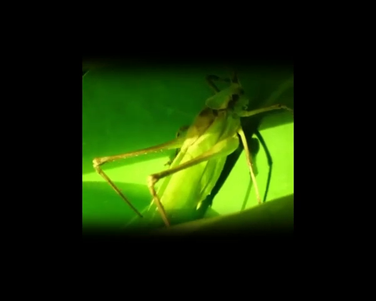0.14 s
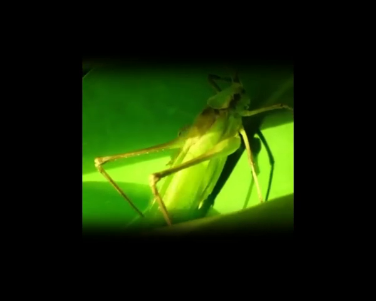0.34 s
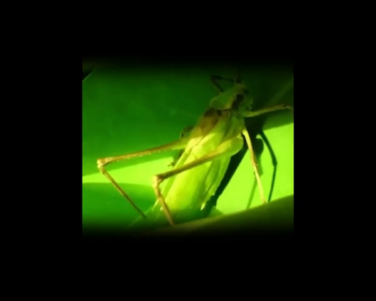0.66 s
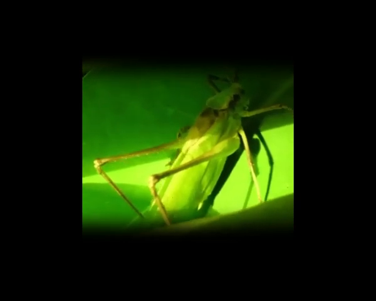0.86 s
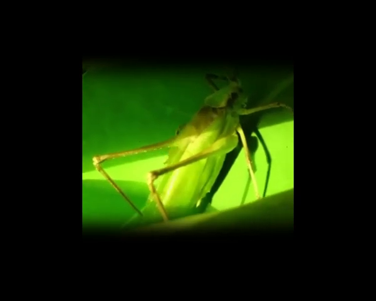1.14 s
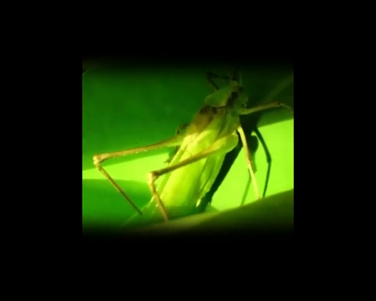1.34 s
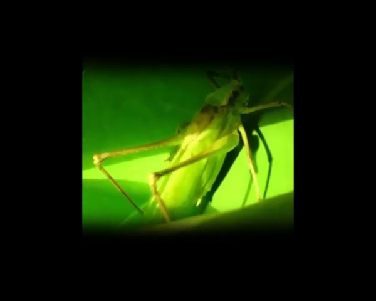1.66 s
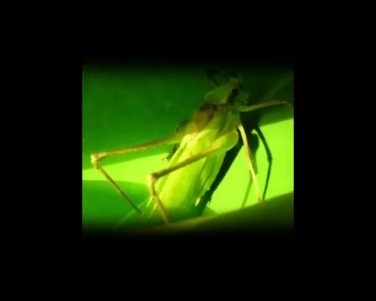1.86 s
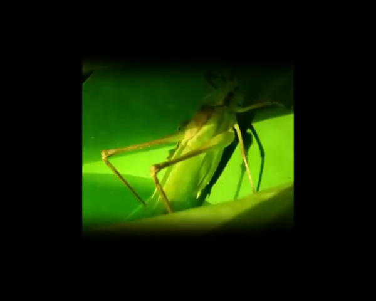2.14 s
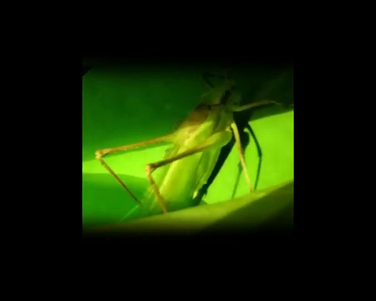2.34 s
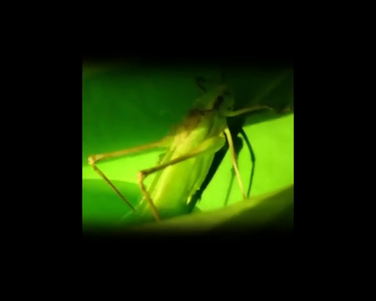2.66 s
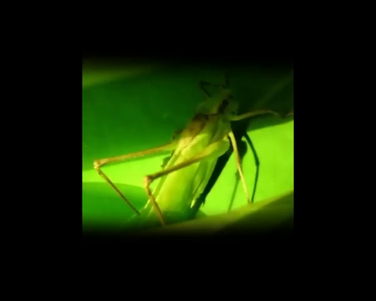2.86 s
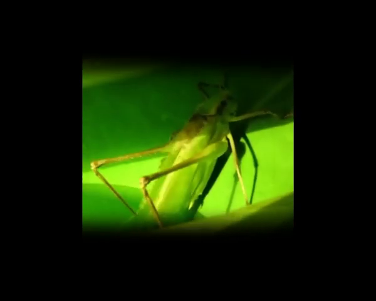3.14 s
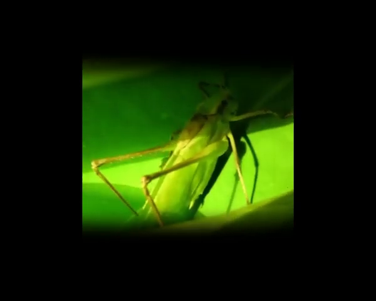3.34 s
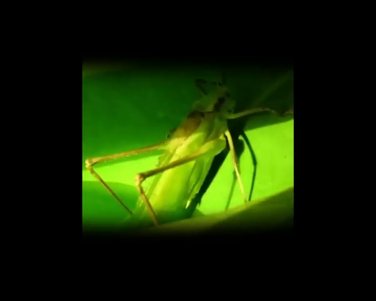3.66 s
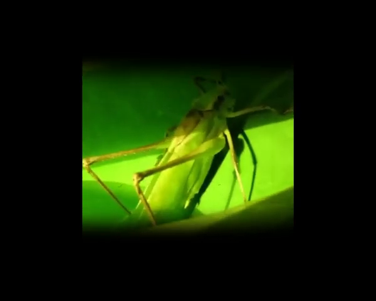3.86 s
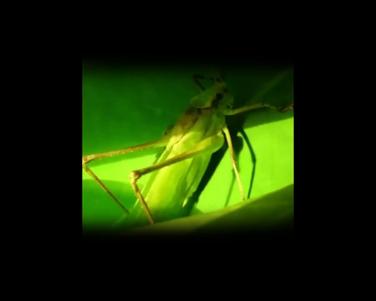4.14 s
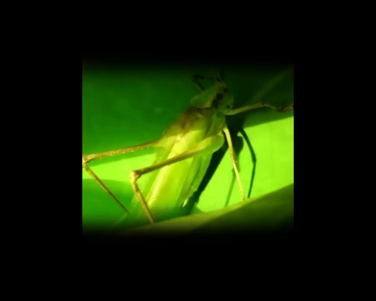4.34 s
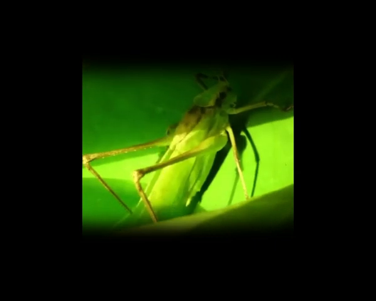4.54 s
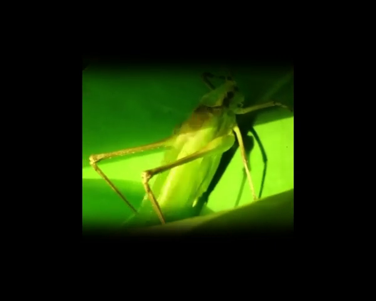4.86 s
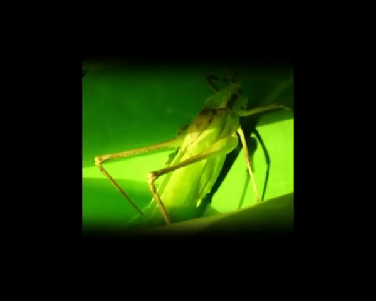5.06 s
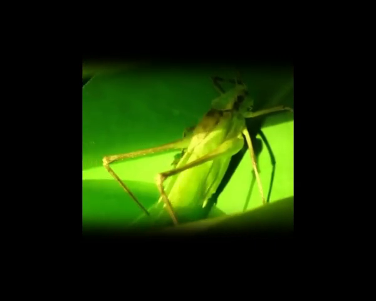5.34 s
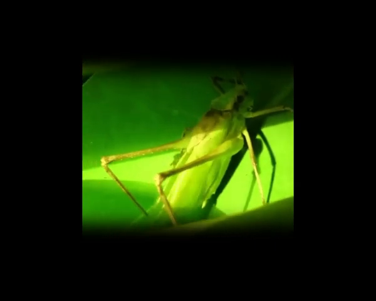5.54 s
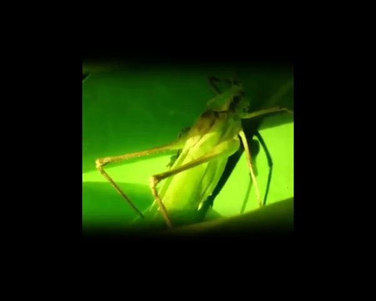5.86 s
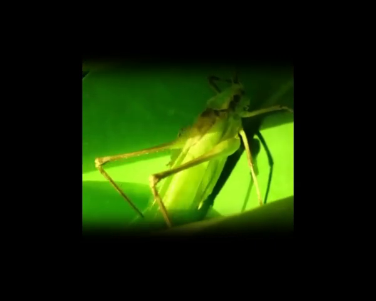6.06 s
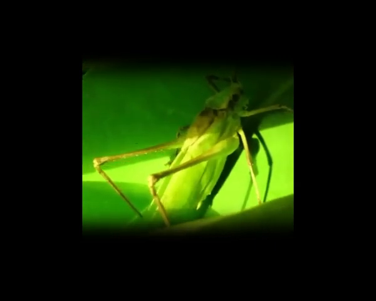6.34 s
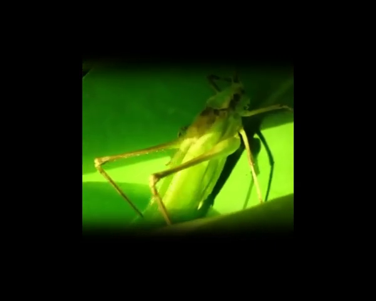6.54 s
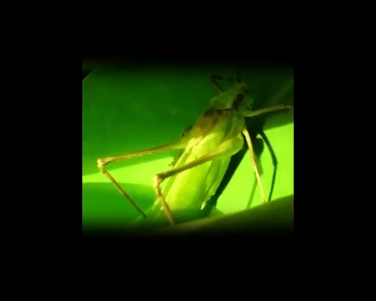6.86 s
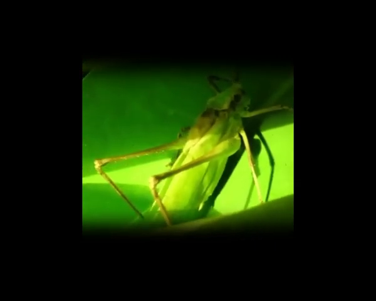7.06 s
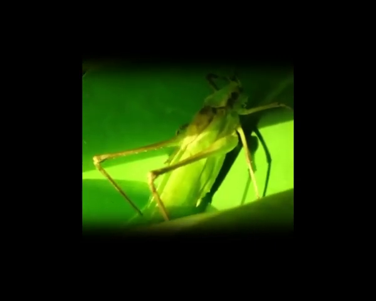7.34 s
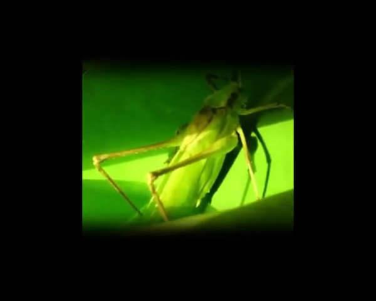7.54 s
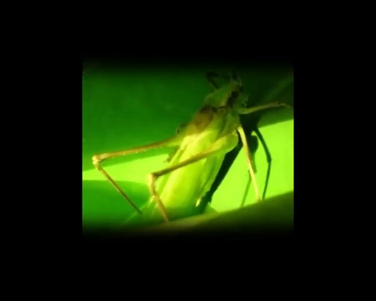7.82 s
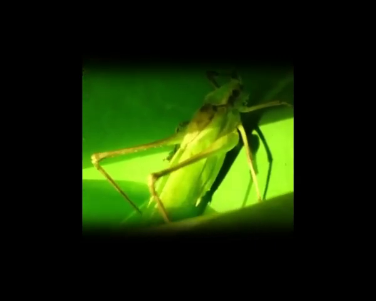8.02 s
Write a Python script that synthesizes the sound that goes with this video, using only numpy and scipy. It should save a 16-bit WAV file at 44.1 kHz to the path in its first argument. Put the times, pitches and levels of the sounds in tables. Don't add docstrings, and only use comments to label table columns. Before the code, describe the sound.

A single katydid sings very close to a small microphone: short, shrill, scratchy chirps, around nine each second, evenly paced throughout. Hard nearby surfaces throw back quick, ringing reflections. Behind it lie soft hiss, low hum and far traffic, with a faint engine passing around two seconds. Just after eight seconds everything drops to silence very briefly, then returns.

```python
import sys
import numpy as np
from scipy import signal
from scipy.fft import rfft, irfft, next_fast_len
from scipy.io import wavfile
from scipy.ndimage import uniform_filter1d

SR = 44100
rng = np.random.default_rng(int(sys.argv[2]) if len(sys.argv) > 2 else 0)


def digitize_waveform(pressure):
    field = np.atleast_2d(pressure).T
    bounded = np.clip(field, -1, 1)
    quanta = np.round(bounded * 32767).astype(np.int16)
    wavfile.write(sys.argv[1], SR, quanta)


def undo_db(level):
    steps = np.asarray(level, float) / 20
    return 10 ** steps


N = 361179
PAD = SR // 4

# pitch_hz [Hz], density_db [dB per Hz]
TYRE_ROAR = [(180, -11.5), (300, -1.2), (518, -0.4), (658, -1.5), (900, -6.5), (1300, -26), (1980, -120)]


def along(points, hz):
    f, v = np.transpose(points)
    return np.interp(np.log(hz + 1), np.log(f + 1), v)


def unit(x):
    return x / np.sqrt(np.mean(x ** 2) + 1e-20)


def wobble(shape, rate):
    span = max(int(SR / rate), 1)
    smooth = uniform_filter1d(rng.standard_normal(shape), span)
    return unit(uniform_filter1d(smooth, span))


def noise(shape, spectrum, spiky=0):
    hz = np.fft.rfftfreq(shape[-1], 1 / SR)
    kicks = rng.standard_normal(shape)
    kicks = kicks * np.abs(kicks) ** spiky
    return unit(irfft(rfft(kicks) * undo_db(along(spectrum, hz)), shape[-1]))


def still_air():
    # pitch_hz [Hz], density_db [dB per Hz]
    air_tone = [(500, -19.5), (900, -14), (1700, -9.5), (2200, -3.5), (5000, -7), (12000, -20),
                (13500, -27), (16000, -32)]
    return undo_db(-57 + 0.27 * wobble(N, 3.8)) * noise((N,), air_tone)


def low_hum(t):
    hum_hz, hum_db = 48, -64
    return undo_db(hum_db + 2.8 * wobble(N, 14)) * np.sqrt(2) * np.sin(2 * np.pi * hum_hz * t)


def far_traffic(t):
    # time_s [s], level_db [dB]
    swell_points = [(0.0, -65), (0.11, -55), (0.76, -61), (0.98, -51), (1.15, -59), (1.56, -56),
                    (1.58, -63), (1.74, -52), (3.21, -58), (3.28, -54), (4.0, -61), (4.02, -70),
                    (4.17, -52), (4.45, -63), (4.56, -57), (4.95, -62.5), (7.8, -61)]
    # pitch_hz [Hz], density_db [dB per Hz]
    thrum = [(31, -49), (52, 1), (75, -7), (110, -4), (140, -47), (240, -120)]
    # pitch_hz [Hz], density_db [dB per Hz]
    drone = [(53, -47), (90, -3), (113, 2.5), (161, 0), (263, -10), (400, -12.5), (520, -39), (880, -120)]
    # level_db [dB over the mean], follow [share of the swell], wander_db [dB of own wander]
    layers = [
        (-4.5, .4, 1.5),
        (-1, 1.1, .8),
        (-3.5, .3, .6),
    ]
    swell_db = np.interp(t, *np.transpose(swell_points))
    mean_db = swell_db.mean()
    traffic = 0
    for (db, follow, wander_db), tone in zip(layers, (thrum, drone, TYRE_ROAR)):
        layer_db = mean_db + db + follow * (swell_db - mean_db)
        layer_db = layer_db + wander_db * wobble(N, 4.5) + 1.8 * wobble(N, 12.3)
        traffic = traffic + undo_db(layer_db) * noise((N,), tone)
    return traffic


def passing_engine(t):
    # time_s [s], firing_hz [Hz], level_db [dB]
    engine_pass = [
        (1.6, 108, -81),
        (1.8, 112, -57),
        (2.1, 116, -64),
        (2.4, 121, -63),
        (2.7, 116, -76),
        (3, 100, -71),
        (3.3, 92, -84),
    ]
    time_s, firing_hz, engine_db = np.transpose(engine_pass)
    turn = 2 * np.pi * np.cumsum(np.interp(t, time_s, firing_hz)) / SR + 0.7 * wobble(N, 25)
    firing = np.sin(turn) + 0.94 * np.sin(2 * turn)
    tyres = undo_db(-0.5) * noise((N,), TYRE_ROAR)
    return undo_db(np.interp(t, time_s, engine_db) + 2.0 * wobble(N, 9.9)) * (firing + tyres)


def far_hoots(t):
    # start_s [s], pitch_hz [Hz], level_db [dB], t60_s [s to fall 60 dB]
    far_calls = [
        (2.265, 920, -55, 0.4),
        (5.795, 910, -54, 0.45),
    ]
    hoots = 0
    for start_s, hz, db, t60_s in far_calls:
        age = np.clip(t - start_s, 0, None)
        envelope = undo_db(db - 60 * age / t60_s + 2.4 * wobble(N, 59.6)) * (1 - np.exp(-age / 0.01))
        band = [(hz - 200, -60), (hz - 50, -3), (hz + 50, -3), (hz + 200, -60)]
        hoots = hoots + envelope * noise((N,), band)
    return hoots


def background():
    t = np.arange(N) / SR
    return far_traffic(t) + still_air() + low_hum(t) + passing_engine(t) + far_hoots(t)


def walls(x, tail_db):
    # delay_ms [ms], low_db [dB at 3 kHz], high_db [dB at 9 kHz]
    echoes = [(5.36, -9, -14), (11.92, -17.5, -14.5), (18.4, -18, -25), (21.4, -20, -27), (26, -18, -29),
              (29.32, -19, -46), (36.16, -19, -24.5), (42.88, -36, -18.5), (58.6, -53, -20.5)]
    # pitch_hz [Hz], t60_s [s]
    room_decay = [(1000, 0.9), (2500, 0.48), (3200, 0.32), (6000, 0.24), (9000, 0.38), (11000, 0.26),
                  (14000, 0.39)]
    # pitch_hz [Hz], gain_db [dB]
    room_tone = [(2350, -14), (2520, 7.5), (2700, 4.5), (2950, -3), (3300, 3), (3700, -2), (6000, 3),
                 (8200, 1.5), (8550, 4.5), (9000, -2), (9400, 5), (10500, 1.5), (13000, 1)]
    hz, t, z = signal.stft(rng.standard_normal(SR // 2), SR, nperseg=256)
    decay = undo_db(-60 * t / along(room_decay, hz)[:, None])
    tail = signal.istft(z * decay, SR, nperseg=256)[1]
    tail *= np.clip((np.arange(len(tail)) / SR - 0.005) / 0.026, 0, 1)
    size = next_fast_len(len(x) + SR)
    hz = np.fft.rfftfreq(size, 1 / SR)
    answer = undo_db(tail_db) * rfft(tail / np.linalg.norm(tail), size)
    for delay_ms, low_db, high_db in echoes:
        tilt = undo_db(along([(3000, low_db), (9000, high_db)], hz))
        answer = answer + tilt * np.exp(-2j * np.pi * hz * delay_ms / 1000)
    return irfft(rfft(x, size) * answer * undo_db(along(room_tone, hz)), size)[:len(x)]


def stroke_rows():
    # first_s [s], last_s [s], level_db [dB, first partial], third_db [dB over the first]
    runs = [(0.0158, 0.3548, -20.2, 3), (0.4683, 0.59, -19.5, 2), (0.7006, 1.043, -20, 2.5),
            (1.159, 1.2693, -20, 2.7), (1.3832, 1.4906, -19.5, 2.5), (1.5996, 1.8239, -20, 2.5),
            (1.9359, 2.2785, -20, 3.5), (2.3969, 2.625, -20.5, 4.5), (2.7342, 2.843, -20.5, 3),
            (2.9568, 3.0737, -21.5, 3), (3.1918, 3.5305, -20, 2.5), (3.6465, 3.7572, -20, 4),
            (3.8734, 3.9863, -20, 3), (4.1049, 4.3273, -19.8, 2.5), (4.438, 4.7759, -20.5, 2),
            (4.8945, 5.0092, -21, 4), (5.1214, 5.2384, -20.5, 4.5), (5.3487, 5.9145, -21, 5),
            (6.0285, 6.2475, -22, 6), (6.3634, 7.2722, -22, 5), (7.3846, 7.5, -22, 5),
            (7.622, 7.7324, -21.5, 4.5), (7.844, 7.9634, -22, 5.0), (8.081, 8.2014, -17, 3.5)]
    pace_s = 0.1136
    rows = []
    for first_s, last_s, db, third_db in runs:
        count = round((last_s - first_s) / pace_s) + 1
        rows += [(s, db, third_db) for s in np.linspace(first_s, last_s, count)]
    rows = np.array(rows)
    rows = np.vstack([rows[0] - [pace_s, 0, 0], rows])
    mean, spread = np.transpose([
        (0, 0.4),
        (0, 0.6),
        (-6, 2.2),
        (5.81, 0.5),
        (13.6, 0.7),
        (-11, 1.8),
        (9.77, 2.8),
        (-12, 3)])
    chance = mean + spread * np.clip(rng.standard_normal((len(rows), len(mean))), -2, 2)
    return np.c_[rows[:, 0], rows[:, 1:] + chance[:, :2], chance[:, 2:]]


def tooth_train(stroke, ms, partial_db, waver, flutter_db):
    # pitch_hz [Hz], gain_db [dB]
    wing = [(2500, 10), (2900, -0.26), (3200, -0.7), (5600, -20.5), (6000, -11.5), (6300, -6.5),
            (8250, -27), (8600, -4.5), (9000, 1.35), (9300, -6), (10900, -6.5), (11200, 7.5),
            (11600, -12.5), (12300, -12)]
    at_ms, rate_hz, pressure_db = np.transpose(stroke)
    each = (len(ms), 1)
    uneven = 1 + waver * wobble(ms.shape, 580) + 0.00522 * rng.standard_normal(each)
    tooth_hz = np.interp(ms, at_ms, rate_hz) * uneven
    turn = 2 * np.pi * (np.cumsum(tooth_hz, axis=1) / SR + rng.random(each))
    level_db = np.interp(ms, at_ms, pressure_db, left=-120, right=-120)
    total = 0
    for k in range(4):
        wing_db = along(wing, (k + 1) * tooth_hz)
        db = level_db + partial_db[:, [k]] + wing_db + flutter_db * wobble(ms.shape, 590)
        total = total + undo_db(db) * np.sqrt(2) * np.sin((k + 1) * turn)
    return total


def closing_stroke(paced_ms, third_db, fourth_db):
    # at_ms [ms from centre], tooth_hz [Hz], pressure_db [dB]
    closing = [
        (-10.5, 2600, -44),
        (-7.5, 2640, -15),
        (-4.5, 2760, -5.5),
        (-3, 2930, -0.5),
        (-0.3, 3010, 0),
        (3, 3045, -2.5),
        (5.5, 3133, -9.5),
        (6.5, 3250, -19.5),
        (10, 4100, -18.5),
    ]
    flat = np.zeros_like(third_db)
    partial_db = np.c_[flat, flat, third_db, fourth_db]
    return tooth_train(closing, paced_ms, partial_db, waver=0.0057, flutter_db=2.0)


def lead_in_stroke(ms, lead_ms, lead_db):
    # at_ms [ms from centre], tooth_hz [Hz], pressure_db [dB]
    lead_in = [
        (-23.5, 2760, -35),
        (-19, 2790, -5),
        (-13.5, 2850, 0.6),
        (-11, 2784, -10),
        (-8.5, 2760, -18),
        (-4, 2710, -22),
    ]
    partial_db = lead_db + [-0.7, 7, 6, -18]
    return tooth_train(lead_in, ms + lead_ms - 14, partial_db, waver=0.009, flutter_db=2.5)


def stray_rings(ms, count, low_hz, high_hz, glide, life_ms):
    pick = rng.random((len(ms), count, 4))
    at_ms = -20 + 30 * pick[..., [0]] ** 0.7
    hz = low_hz * (high_hz / low_hz) ** pick[..., [1]]
    age = ms[:, None] - at_ms
    turn = 2 * np.pi * (hz * age / 1000 * (1 + glide * age / 2) + pick[..., [2]])
    envelope = undo_db(6 * pick[..., [3]] - 4.5) * np.exp(-(age / life_ms) ** 2)
    return np.sum(envelope * np.sin(turn), axis=1)


def scrape_noise(ms, paced_ms):
    # at_ms [ms from centre], dull_db [dB], bright_db [dB]
    scrape_course = [(-26, -40, -61), (-18.5, -20, -27.5), (-10.5, -20.5, -23.5), (-7, -12.5, -14),
                     (4.5, -18, -18.5), (4.5, -14, -17.5), (11, -28.5, -16.5), (23, -23.5, -28),
                     (40, -54, -60)]
    # pitch_hz [Hz], density_db [dB per Hz]
    dull_tone = [(1500, -29.5), (2300, -18), (2600, -5.5), (3500, -5.5), (4100, 1.5), (5200, -4.5),
                 (6200, -2), (7400, -9.5), (8200, 5), (9000, -60)]
    # pitch_hz [Hz], density_db [dB per Hz]
    bright_tone = [(7000, -26.5), (8300, -10), (9000, 1), (10500, -2.5), (12500, -13.5), (13200, -10),
                   (13500, -34), (17000, -53)]
    at_ms, dull_db, bright_db = np.transpose(scrape_course)
    rings = stray_rings(ms, count=10, low_hz=3280, high_hz=7950, glide=0.0094, life_ms=1.67)
    grain_db = 3 * wobble(ms.shape, 470)
    dull = undo_db(grain_db - 3.0) * noise(ms.shape, dull_tone) + 1.21 * rings
    bright = undo_db(grain_db) * noise(ms.shape, bright_tone, spiky=0.77)
    return undo_db(np.interp(paced_ms, at_ms, dull_db)) * dull + undo_db(np.interp(paced_ms, at_ms, bright_db)) * bright


def final_rasp(ms, rasp_ms, rasp_db):
    # pitch_hz [Hz], density_db [dB per Hz]
    rasp_tone = [(5000, -26.5), (8500, -6.5), (9600, -11), (10500, 9.5), (11400, 3), (12500, -32),
                 (14000, -18)]
    envelope = undo_db(rasp_db + 2.0 + 1.8 * wobble(ms.shape, 900)) * np.exp(-((ms - rasp_ms) / 2.27) ** 2)
    return envelope * noise(ms.shape, rasp_tone, spiky=0.96)


def katydid():
    columns = stroke_rows().T[:, :, None]
    start_s, db, third_db, fourth_db, rise_ms, lead_ms, lead_db, rasp_ms, rasp_db = columns
    ms = np.arange(-1200, 1200) / SR * 1000 + 0 * start_s
    paced_ms = np.where(ms < 0, ms * 5.95 / rise_ms, ms)
    strokes = closing_stroke(paced_ms, third_db, fourth_db) + lead_in_stroke(ms, lead_ms, lead_db)
    strokes = strokes + scrape_noise(ms, paced_ms) + final_rasp(ms, rasp_ms, rasp_db)
    strokes = undo_db(db) * strokes
    where = (np.round(start_s * SR) + np.round(ms / 1000 * SR)).astype(int) + PAD
    return np.bincount(where.ravel(), strokes.ravel(), N + 2 * PAD)[:N + PAD]


def scene():
    song = katydid()
    near = song + walls(song, tail_db=-11.5)
    return (near[PAD:] + background())[None]


def microphone(x):
    size = next_fast_len(N)
    hz = np.fft.rfftfreq(size, 1 / SR)
    rounded = x / (1 + np.abs(x / 0.42) ** 4) ** 0.25
    response = [(7950, 0), (8230, -9), (8420, 0), (13100, 0), (13500, -18)]  # (Hz, dB)
    return irfft(rfft(rounded, size) * undo_db(along(response, hz)), size)[:N]


def converter_copies(x):
    slip_curve = [(0, .1), (.06, .75), (.14, .45), (.26, 0), (.35, .15), (.53, .85), (.7, 1), (.94, .95),
                  (1, .1)]
    # level_db [dB at no slip], gained_db [dB more at full slip]
    copy_levels = [
        (-28.5, 13),
        (-25.5, 5.5),
        (-18.5, 3.5),
        (-31, -0.1),
    ]
    slip_start_s, slip_period_s = 0.93, 1.701
    shift_hz, split_hz = 3900, 10000
    t = np.arange(N) / SR
    size = next_fast_len(N)
    hz = np.fft.rfftfreq(size, 1 / SR)
    treble = rfft(x, size) * (hz / 9000) ** 2.26 * (hz < 13500)
    below = signal.hilbert(irfft(treble * (hz < split_hz), size))[:N]
    above = signal.hilbert(irfft(treble * (hz >= split_hz), size))[:N]
    cycle = (t - slip_start_s) / slip_period_s % 1
    slip = np.interp(cycle, *np.transpose(slip_curve))
    up_below, up_above, down, twice_down = (undo_db(db + gained_db * slip) for db, gained_db in copy_levels)
    twice_down = twice_down * undo_db(2.5 * np.cos(4 * np.pi * (cycle - 0.26)))
    clock = np.exp(2j * np.pi * shift_hz * t)
    upper = (up_below * below + up_above * above) * clock
    lower = (below + above) * (down / clock + twice_down / clock ** 2)
    return np.real(upper + lower)


def dropout_and_top_cut(x):
    silence_start_s, silence_end_s, top_hz = 8.0345, 8.0965, 16580
    t = np.arange(N) / SR
    fade_out = (silence_start_s - t) / 0.00078
    fade_in = (t - silence_end_s) / 0.0011
    gate = np.clip(np.maximum(fade_out, fade_in), 0, 1)
    size = next_fast_len(N)
    hz = np.fft.rfftfreq(size, 1 / SR)
    return irfft(rfft(x * gate, size) * (hz < top_hz), size)[None, :N]


def band_limit(x):
    return signal.sosfilt(signal.butter(12, 16700, fs=SR, output="sos"), x)


def record(dry):
    x = microphone(dry[0])
    heard = dropout_and_top_cut(x + converter_copies(x))
    return band_limit(heard)


dry = scene()
out = record(dry)
digitize_waveform(out)
```